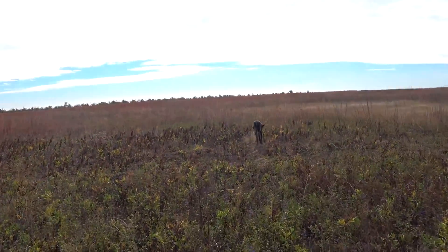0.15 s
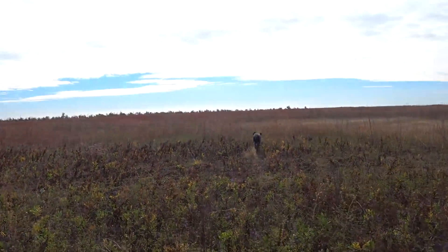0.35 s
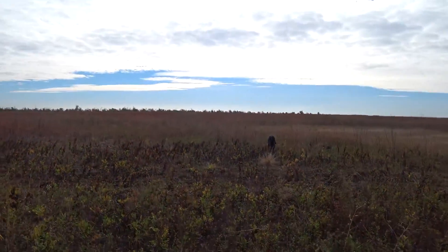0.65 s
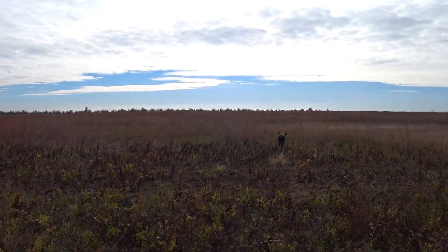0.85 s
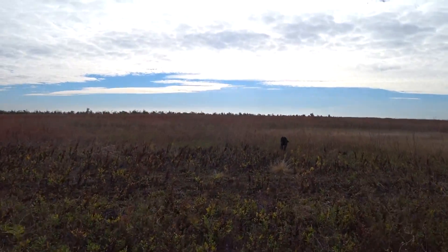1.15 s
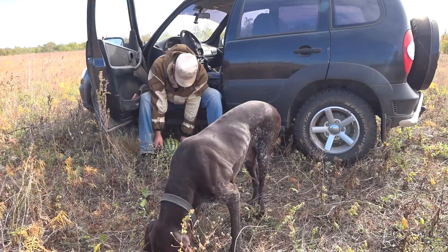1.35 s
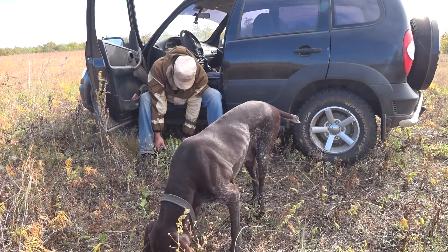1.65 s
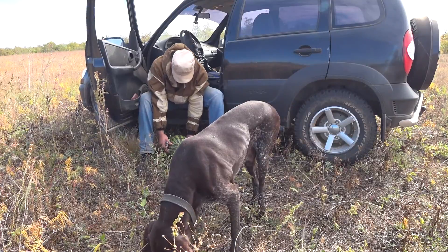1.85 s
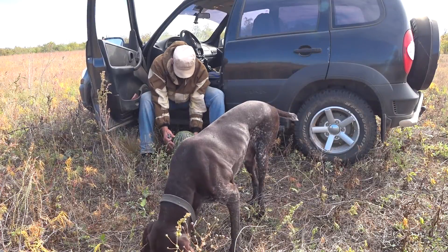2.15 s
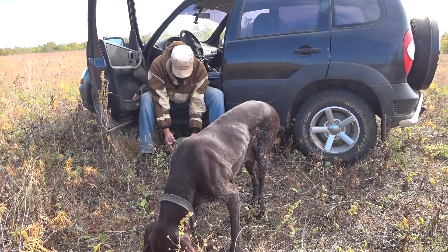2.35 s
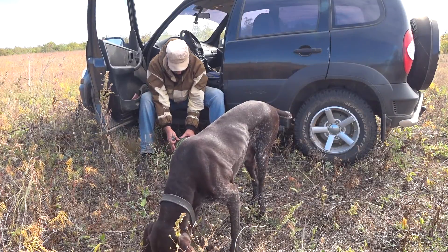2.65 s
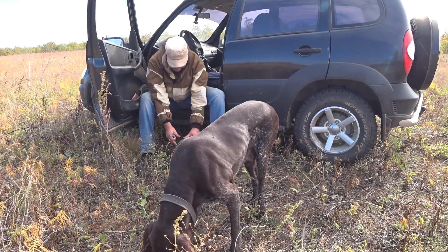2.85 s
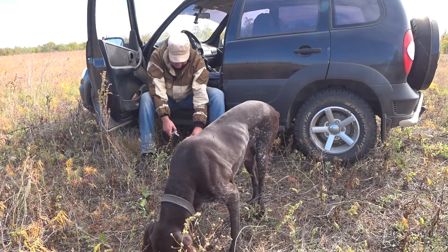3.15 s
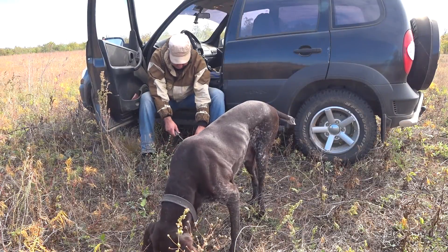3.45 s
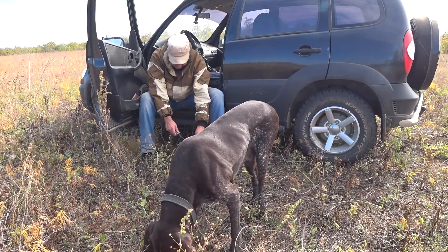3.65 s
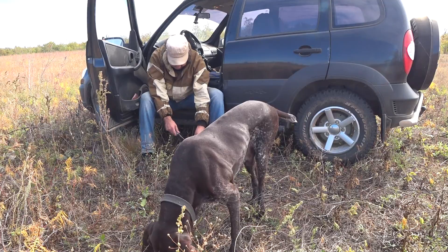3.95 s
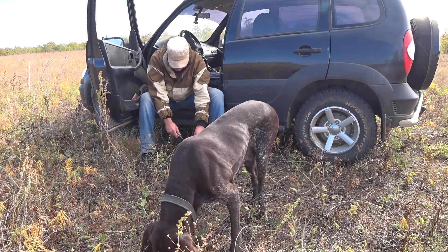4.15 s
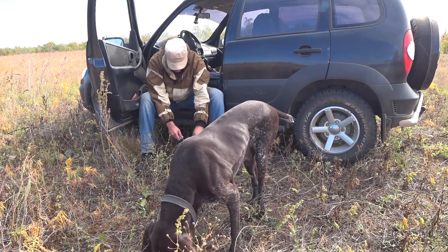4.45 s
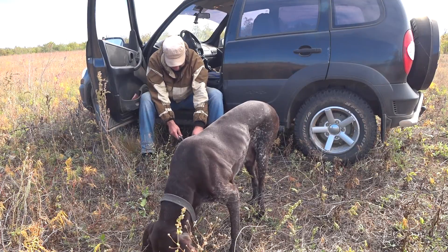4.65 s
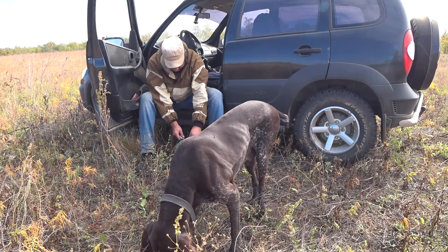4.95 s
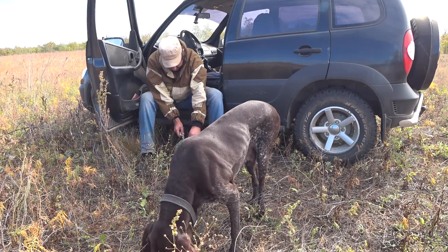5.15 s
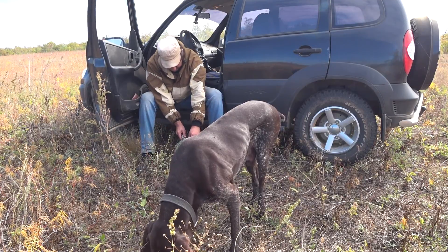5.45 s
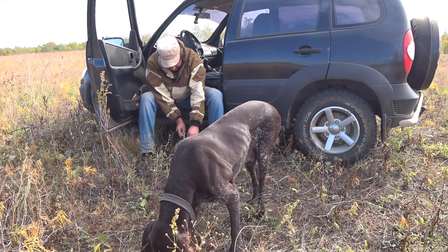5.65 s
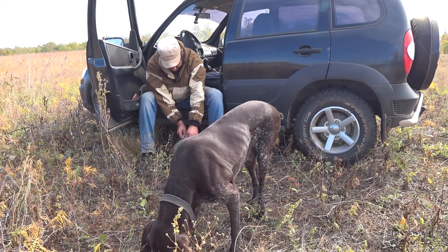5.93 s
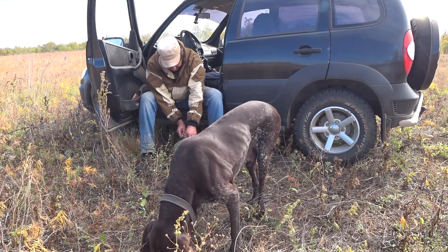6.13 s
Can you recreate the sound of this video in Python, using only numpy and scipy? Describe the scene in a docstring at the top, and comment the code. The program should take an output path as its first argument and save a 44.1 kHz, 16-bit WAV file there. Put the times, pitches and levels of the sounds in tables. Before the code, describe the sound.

Dry grass swishes and stalks snap around walking legs, then abruptly a dog close by laps wet food with quick, regular smacks and crackles.

```python
"""An open field: dry grass swishes and snaps around someone's legs; then, close by, a dog gulps wet food.
Mouth: about three times a second lips slap, the tongue pops free and saliva crackles, as decaying tones
and shaped clicks; these also excite the faintly ringing modes of the bowl.
Straw and grass are random impulses with a spectrum and an envelope; snaps are short resonant noise bursts.
During the meal a light wind flutters on the microphone; filtered noise forms the wind and the air."""
import sys
import numpy as np
from scipy import signal
from scipy.fft import rfft, irfft
from scipy.io import wavfile

SR = 44100
rng = np.random.default_rng(int(sys.argv[2]) if len(sys.argv) > 2 else 0)


def dump_mix(stems):
    """Bounce the given channels to the path in sys.argv[1] as a 16-bit WAV at rate SR."""
    frames = np.atleast_2d(stems).T  # one column per channel
    limited = np.clip(frames, -1, 1)  # hard clip at full scale
    pcm = np.round(limited * 32767).astype(np.int16)
    wavfile.write(sys.argv[1], SR, pcm)


N = 277475
TIME, FREQ = np.arange(N) / SR, np.fft.rfftfreq(N, 1 / SR)  # s, Hz
FIELD_END_S = 1.213  # the scene changes from the field to the dog's meal
EDGE_HZ = 16100

# Source levels below hold before propagation; the mouth is also high-passed.
# licks, timed at the smack: [t/s, pop level/dB, cavity f/Hz, ring/s, second pop level/dB, suck level/dB,
# spray level/dB (raised 7 dB in use), lip slap level/dB, drag lead/s, squish level/dB, rustle level/dB]
LICK_EVENTS = [(1.3276, -12.5, 1166, 0.00093, -21.5, -46, -38, -31, 0.03, -44.5, -50),
               (1.6269, -14.5, 1140, .001, -19, -45, -34.5, -32, 0.035, -44.5, -45.5),
               (1.9313, -18, 1157, 0.00096, -28, -49, -40.5, -33, 0.042, -46, -51.5),
               (2.328, -20, 1373, 0.0017, -42, -56, -48.5, -32, 0.041, -43.5, -42),
               (2.6225, -20.5, 1292, 0.0023, -22.5, -49, -40.5, -36.5, .05, -44, -48.5),
               (2.9366, -15.5, 1170, 0.00093, -29, -50, -46.5, -37.5, 0.039, -44, -50),
               (3.3254, -20.5, 1137, .0008, -31, -39.5, -40, -35.5, 0.033, -46.5, -51.5),
               (3.6228, -15, 1220, 0.00085, -22.5, -58, -36.5, -31.5, 0.038, -46, -48.5),
               (3.925, -8.5, 1300, 0.0006, -30, -45, -39, -32, 0.039, -44, -51),
               (4.3047, -17.5, 1363, 0.00062, -38, -41, -35.5, -29, 0.038, -39, -44),
               (4.6031, -14.5, 1247, .0007, -37, -43, -37.5, -36, 0.035, -43.5, -47.5),
               (4.908, -21, 1178, 0.00063, -20.5, -41, -42, -35, 0.043, -40.5, -47),
               (5.2998, -17, 1465, 0.0011, -42, -55, -33.5, -37, 0.057, -42.5, -50.5),
               (5.591, -13.5, 1177, 0.00086, -33, -47, -36.5, -34, 0.036, -46, -47.5),
               (5.8973, -9.5, 1218, 0.00091, -20.5, -61, -39, -34, 0.055, -40, -44.5),
               (6.2892, -12.5, 1210, 0.0006, -24, -43, -44, -31, 0.039, -41.5, -49)]
# modes of the lips flapping shut: [f/Hz, level/dB relative to the slap, ring/s]
LIP_MODES = [(460, -1, 0.00079), (947, 4, 0.00095)]
# the loudest saliva bubbles and crunches: [t/s, peak level/dB, f/Hz, ring/s]
LOUD_BUBBLES = [(1.4027, -26, 3020, 0.00035), (1.6298, -16.5, 2740, 0.00055),
                (1.6399, -14.5, 1850, 0.00042), (1.984, -31, 2960, 0.00062), (2.2353, -31, 4140, 0.0011),
                (2.2704, -28, 2620, 0.00074), (2.3213, -17.5, 1120, 0.00039), (2.3338, -18, 2550, 0.00045),
                (2.3906, -25, 2820, 0.00034), (2.8494, -31.5, 2910, 0.0017), (2.8755, -26.5, 660, 0.00094),
                (2.8868, -31.5, 3990, 0.0013), (3.119, -37.5, 2260, 0.0028), (3.4005, -30, 1520, .0013),
                (3.414, -18.5, 1670, 0.00053), (3.718, -30.5, 1910, 0.00076), (3.735, -35, 2200, 0.00088),
                (3.801, -32.5, 1530, .001), (3.837, -31, 2720, 0.00049), (4.0633, -17, 2570, 0.0002),
                (4.2054, -32.5, 3800, .0014), (4.3188, -14, 2520, 0.00054), (4.52, -30, 3450, 0.0007),
                (4.556, -31, 2710, .0006), (4.713, -34, 3130, 0.00078), (4.7866, -22, 3180, 0.00013),
                (5.0386, -20.5, 4500, 0.00017), (5.0486, -24.5, 1630, 0.00075), (5.2092, -25, 3410, 0.0013),
                (5.24, -14, 3280, 0.00034), (5.2944, -18, 1340, 0.00055), (5.303, -14.5, 2730, .00055),
                (5.5055, -32.5, 2490, .0016), (5.5403, -18.5, 3100, 0.00034), (5.7043, -34.5, 2040, .0012),
                (5.7673, -31, 1630, .00078), (6.0385, -33, 1480, 0.00052), (6.071, -34.5, 2360, 0.0017),
                (6.216, -25.5, 3980, 0.00083)]
# the loudest cracks of food and straw: [t/s, level/dB (lowered 2 dB in use), centre f/Hz]
CRACK_EVENTS = [(1.4552, -31.5, 7000), (1.5695, -32, 11100), (1.8271, -37.5, 10000), (1.8776, -29.5, 4470),
                (2.0641, -32, 5900), (2.2663, -36, 6800), (2.5039, -32.5, 10500), (2.767, -36.5, 11000),
                (2.96, -37, 7000), (3.2772, -34.5, 5700), (3.383, -31.5, 7060), (3.4063, -30.5, 12100),
                (3.5667, -28.5, 5230), (3.8169, -36, 8400), (3.8705, -33.5, 9800), (4.151, -37, 6170),
                (4.263, -41, 10000), (4.4296, -40.5, 12400), (4.5453, -18, 4600), (4.6522, -33.5, 12800),
                (4.7458, -39, 11600), (5.1056, -38, 10100), (5.2386, -28, 4600), (5.4303, -30, 11800),
                (5.5375, -30, 4140), (5.7318, -38.5, 11500), (6.2433, -29, 9700)]
# the muzzle nudges or grazes the bowl: [t/s, level/dB, extra level/dB of the long mode]
BOWL_KNOCKS = [(1.216, -48, -9), (1.707, -59.5, 20), (1.804, -48, 0), (2.202, -51, -7), (2.872, -52, 3),
               (3.293, -41.5, 3), (4.188, -44, -8), (4.66, -56, 6), (5.42, -52.5, 11), (6.17, -38.5, -3)]
# modes of the bowl: [f/Hz, level/dB, t60/s]
BOWL_MODES = [(635, 2.5, 0.15), (900, -1.5, 0.065), (1140, -8, 0.25), (1690, 8.5, 0.026), (2380, -6, 0.084)]
# the loudest stalks that snap in the field: [t/s, level/dB (lowered 2.5 dB in use), centre f/Hz]
STALK_SNAPS = [(0.3903, -25, 6400), (0.4171, -15, 6200), (0.4415, -20, 6850), (0.4734, -22, 4800),
               (0.4928, -22, 5000), (0.5246, -20, 4800), (0.5427, -25, 8200), (0.559, -25, 6800),
               (0.5945, -28.5, 6200), (0.6342, -24, 6100), (0.6649, -25.5, 2700), (0.7103, -23, 6050),
               (0.7613, -24, 5740), (0.7854, -14, 5750), (0.8142, -30, 6100), (0.8847, -25, 4630),
               (0.9372, -24, 7900), (1.0217, -27, 5100), (1.0766, -27.5, 7200), (1.1074, -24, 7150),
               (1.1412, -26, 6400), (1.1485, -26, 11200)]
# legs through the grass, two strides: [t/s, level/dB (lowered 4 dB for the brushing)]
LEG_SWISH = [(0, -38.5), (.035, -35), (.088, -48), (.16, -36.5), (.225, -23), (.25, -18), (.275, -20.5),
             (.34, -17), (.385, -21), (.407, -17), (.445, -33), (.49, -30.5), (.615, -42.5), (.65, -40),
             (.72, -32.5), (.81, -40), (.91, -31.5), (.977, -21.5), (1.04, -34), (1.209, -41.5)]
# a foot comes down on stalks: [t/s, level/dB, hold/s]
FOOTSTEPS = [(0.32, -28, 0.03), (0.848, -25, 0.045)]
# wind on the microphone: [t/s, level/dB (raised 2 dB in use)]
WIND_GUSTS = [(1.215, -91), (1.53, -58), (1.7, -65), (1.92, -64), (1.98, -48), (2.18, -54.5), (2.31, -44),
              (2.5, -77), (2.79, -63), (2.84, -49.5), (2.99, -53), (3.08, -57), (3.27, -48.5),
              (3.35, -37.5), (3.6, -51.5), (3.69, -44.5), (3.82, -50.5), (4.06, -41.5), (4.36, -52),
              (4.55, -50), (4.78, -44.5), (5.06, -42), (5.15, -35.5), (5.38, -55), (5.6, -38),
              (5.75, -64.5), (5.83, -48.5), (6.16, -63.5), (6.284, -35.5)]

# filter for froth and grit in the wet food and spray: [f/Hz, gain/dB]
SALIVA_FILTER = [(300, 17), (800, 0), (1400, 2), (2000, -1.5), (3000, 2.5), (4500, -1), (6500, -2),
                 (8500, -14), (16000, -22)]
SPRAY_FILTER = [(800, -12), (1800, 3), (2800, 5.5), (4200, 4.5), (6000, 1.5), (8000, -8.5), (12000, -21),
                (16000, -30)]
# relative spectra of straw, grass blades, crushed stalks and low bending stems: [f/Hz, level/dB per Hz]
STRAW_SPECTRUM = [(2000, -22), (5000, 1), (7000, -1.5), (10000, 3), (13000, 0.5), (16000, -6)]
GRASS_SPECTRUM = [(60, -68), (130, -65), (250, -37), (450, -24), (1050, -15.5), (1900, -14), (3200, -5.5),
                  (4500, -3), (6300, 0), (8000, -5.5), (10300, -5.5), (12000, -12.5), (15000, -4),
                  (16500, -34)]
STALK_SPECTRUM = [(300, -23.5), (900, -1), (2000, -5), (3200, 1.5), (6000, 6), (8000, -5), (16000, -36)]
SCUFF_SPECTRUM = [(60, -52), (200, -16), (450, -2.5), (1000, 0.5), (1800, -1.5), (3500, -3.5), (8000, -24)]
# relative spectra of wind turbulence, the breeze's rumble beside the car, and air: [f/Hz, level/dB per Hz]
WIND_SPECTRUM = [(20, -38), (60, -15.5), (120, -2), (220, 1.5), (400, -1), (600, -7.5), (1000, -20.5),
                 (2000, -38), (6000, -53)]
RUMBLE_SPECTRUM = [(20, -27), (50, -7), (110, -3), (200, -7), (400, -56), (2000, -52)]
AIR_SPECTRUM = [(20, -41), (100, -13), (200, -13), (420, -9.5), (940, -1.5), (1460, 0.5), (1960, -4),
                (4500, -13), (7300, -12.5), (11000, -16.5), (15000, -22), (16500, -20)]

# phase by which the left microphone port leads, for wind and for direct sound: [f/Hz, phase/rad]
WIND_LEAD = [(30, -2), (80, 1.4), (160, 1.46), (300, 2), (700, 2.5)]
DIRECT_LEAD = [(100, 0.45), (2500, 0), (5000, 0.15), (8500, 0.46), (12000, 0), (16000, 0)]
# direct sound, left port minus right: [f/Hz, level/dB]
DIRECT_BALANCE = [(100, 0), (2500, -0.2), (5000, 1), (8500, 2.5), (12000, 3.5), (16000, -1)]
# near blades, side signal against middle: [f/Hz, level/dB]
BLADE_SIDE = [(100, -30), (700, -3), (1300, -18), (2500, -74), (4500, -25), (8500, -12), (12000, -5),
              (16000, -47)]

# the course of every lick: leads before and lags after its smack
TOUCH_LEAD_S, SLAP_LEAD_S, SECOND_POP_S, SPRAY_LAG_S = 0.1233, 0.037, 0.0085, 0.01
SECOND_POP_RATIO = 1.229  # the cavity has shrunk by then
# (rise dB/s, fall dB/s): the tongue lands, drags through food, the mouth settles
TOUCH_SLOPES, DRAG_SLOPES, SETTLE_SLOPES = (1300, 180), (185, 207), (600, 380)
# (rise dB/s, fall dB/s): the muzzle stirs the straw, which then springs back
RUSTLE_SLOPES, SPRING_SLOPES = (116, 340), (1500, 300)
# wet noise as the tongue lands, as the mouth settles, and between licks
TOUCH_DB, SETTLE_DB, WET_FLOOR_DB = -49.5, -43, -57.5
# straw springing back, and between licks, before a 0.5 dB cut
SPRING_DB, RUSTLE_FLOOR_DB = -50.5, -64
# small bubbles at random in the wake of each smack: median level and pitch, with normal spreads
BUBBLE_DB, BUBBLE_SPREAD_DB, BUBBLE_HZ, BUBBLE_OCTAVES, BUBBLE_RING_S = -40.5, 4, 2380, 0.61, 0.00049
CLUSTER_LAG_S, CLUSTER_JITTER_S, CLUSTER_WIDTH_S = 0.09, 0.024, 0.018
TICK_DB, TICK_HZ = -45, 10100  # faint ticks at random times
LONG_MODE_S = 0.2  # a bowl mode with a longer t60 sings when grazed
# (rise dB/s, fall dB/s) of a step; flattened stalks creak on, at a level relative to the step
STEP_SLOPES, CREAK_DB, CREAK_SLOPES = (3800, 660), -18, (1200, 62)


def smacks():
    """Cavity resonance: lips slap, the tongue pops twice, air sucks through a narrowing gap, saliva sprays."""
    out, spray_gain = np.zeros(N), np.zeros(N)
    t = np.arange(1800) / SR
    for s, pop_db, hz, ring, second_db, suck_db, spray_db, slap_db, *_ in LICK_EVENTS:
        for lip_hz, lip_db, lip_ring in LIP_MODES:
            add(out, s - SLAP_LEAD_S, gain_of(slap_db + lip_db) * pop(lip_hz, lip_ring))
        add(out, s, gain_of(pop_db) * pop(hz, ring, glide=0.0019))
        add(out, s, gain_of(pop_db - 22) * pop(hz * 2.2, ring * 1.5))  # second cavity mode
        add(out, s + SECOND_POP_S, gain_of(second_db) * pop(hz * SECOND_POP_RATIO, ring))

        # suction: narrow-band noise carried on a rising cavity tone
        noise = rng.standard_normal((len(t), 2)) @ [1, 1j]
        flutter = signal.lfilter([1], [1, -np.exp(-np.pi * 260 / SR)], noise)
        rising = np.exp(2j * np.pi * hz * (t + 6 * t ** 2))
        envelope = np.exp(-((t - 0.0095) / 0.0058) ** 2)
        add(out, s, gain_of(suck_db) * evened((flutter * rising).real * envelope))
        add(spray_gain, s, gain_of(spray_db + 7) * np.exp(-abs(t - SPRAY_LAG_S) / 0.0073))
    spray = froth(SPRAY_FILTER, per_s=1500, spread_db=3.0, cycles=2.1, hiss=0.25)
    return out + spray_gain * spray


def chewing():
    """Power addition of wet bubble noise as the tongue lands, drags through food and settles."""
    power = gain_of(WET_FLOOR_DB) ** 2
    for s, *_, lead, squish_db, _ in LICK_EVENTS:
        touch = swell(s - TOUCH_LEAD_S, TOUCH_DB, TOUCH_SLOPES)
        drag = swell(s - lead, squish_db, DRAG_SLOPES)
        settle = swell(s + SPRAY_LAG_S, SETTLE_DB, SETTLE_SLOPES)
        power = power + touch ** 2 + drag ** 2 + settle ** 2
    clumps = gain_of(2.8 * slow_chance(130))
    foam = froth(SALIVA_FILTER, per_s=900, spread_db=3.2, cycles=2.1, hiss=0.1)
    grit = coloured(crackle(260, 3), SPRAY_FILTER)
    return np.sqrt(power) * (clumps * foam + grit / 2) * (TIME > FIELD_END_S)


def bubbles(count=4):
    """Bubble resonance: loud single saliva bursts, and a cluster of small ones after every smack."""
    out = np.zeros(N)
    for s, db, hz, ring in LOUD_BUBBLES:
        add(out, s, gain_of(db) * pop(hz, ring, glide=0.0043))
    for s, *_ in LICK_EVENTS:
        centre = s + CLUSTER_LAG_S + CLUSTER_JITTER_S * rng.standard_normal()
        for late, loud, high in rng.standard_normal((count, 3)):
            bubble = pop(BUBBLE_HZ * 2 ** (BUBBLE_OCTAVES * high), BUBBLE_RING_S)
            gain = gain_of(BUBBLE_DB + BUBBLE_SPREAD_DB * loud)
            add(out, centre + CLUSTER_WIDTH_S * late, gain * bubble)
    return out


def bowl(mouth):
    """Modal resonance: the bowl rings when nudged, and faintly in response to the mouth."""
    t, out = np.arange(SR // 2) / SR, np.zeros(N)
    for hz, db, t60 in BOWL_MODES:
        mode = gain_of(db - 60 * t / t60) * np.sin(2 * np.pi * hz * t)
        out += gain_of(-60.5) * signal.oaconvolve(mouth, mode)[:N]
        for s, knock_db, sing_db in BOWL_KNOCKS:
            add(out, s, gain_of(knock_db + sing_db * (t60 > LONG_MODE_S)) * mode)
    return out


def straw(count=6):
    """Impulsive friction: dry stems crackle with each push of the muzzle; crisp bits crack and tick."""
    power = gain_of(RUSTLE_FLOOR_DB) ** 2
    for s, *_, lead, _, rustle_db in LICK_EVENTS:
        push = swell(s - lead, rustle_db, RUSTLE_SLOPES)
        spring_back = swell(s + SPRAY_LAG_S, SPRING_DB, SPRING_SLOPES)
        power = power + push ** 2 + spring_back ** 2
    stems = gain_of(2.5 * slow_chance(110)) * coloured(crackle(550, 4.4), STRAW_SPECTRUM)
    rustle = gain_of(-0.5) * np.sqrt(power) * stems * (TIME > FIELD_END_S)
    ticks = [(s, TICK_DB, TICK_HZ) for s in rng.uniform(FIELD_END_S, N / SR, count)]
    cracks = gain_of(-2.0) * snaps(CRACK_EVENTS, decay=0.0012, width=0.25, splinter=0.16)
    return rustle + cracks + snaps(ticks, decay=0.0012, width=0.25, splinter=0.16)


def grass():
    """Friction and fracture: blades brush past in clumps, brighter when stronger; stalks are crushed and snap."""
    in_field = TIME < FIELD_END_S
    swish = level(LEG_SWISH)
    brushing = swish * gain_of(-4 + 1.85 * slow_chance(100)) * in_field
    middle, side = (coloured(crackle(7000, 3.1), GRASS_SPECTRUM) for _ in range(2))
    side = irfft(rfft(side) * gain_of(read(BLADE_SIDE)), N)
    scuff_gain = gain_of(-29.5) * swish ** 0.45  # grows more slowly than the hiss
    scuff = scuff_gain * coloured(crackle(1500, 5.5), SCUFF_SPECTRUM)

    weight = 0
    for s, db, hold in FOOTSTEPS:
        press = swell(s, db, STEP_SLOPES, hold)
        creak = swell(s, db + CREAK_DB, CREAK_SLOPES, hold)
        weight = weight + np.maximum(press, creak)
    crush = weight * coloured(crackle(6000, 2.5), STALK_SPECTRUM)
    breaks = gain_of(-2.5) * snaps(STALK_SNAPS, decay=0.00093, width=0.39, splinter=0.067)
    near = brushing * middle + (scuff + crush) * in_field + breaks
    return outdoors(near, scatter_db=-12.0, t60=0.01) + np.outer([1, -1], brushing * side)


def wind():
    """Turbulent pressure: lumpy gusts reach the two ports out of phase, over a rumble common to both."""
    eddies = rfft(coloured(rng.standard_normal(N), WIND_SPECTRUM))
    ports = irfft(eddies * np.exp(0.5j * np.outer([1, -1], read(WIND_LEAD))), N)
    own = np.array([coloured(rng.standard_normal(N), WIND_SPECTRUM) for _ in range(2)])
    lumps = gain_of(3.2 * slow_chance(35) + 2)
    rumble = gain_of(-66.5) * coloured(rng.standard_normal(N), RUMBLE_SPECTRUM)
    return (lumps * level(WIND_GUSTS) * (ports + 0.32 * own) + rumble) * (TIME > FIELD_END_S)


def air():
    """Diffuse noise: the faint, slightly stirring hiss of the field, largely independent at the two ports."""
    common, left, right = (coloured(rng.standard_normal(N), AIR_SPECTRUM) for _ in range(3))
    stir = gain_of(-65 + 3.7 * slow_chance(38))
    return stir * (common + 3.45 * np.array([left, right]))


def outdoors(x, scatter_db, t60):
    """Propagation and scattering: direct sound just left of centre; ground, stems and car scatter it briefly."""
    balance = gain_of(np.outer([0.5, -0.5], read(DIRECT_BALANCE)))
    lead = np.exp(0.5j * np.outer([1, -1], read(DIRECT_LEAD)))
    direct = irfft(rfft(x) * balance * lead, N)
    t = np.arange(SR // 4) / SR
    decay = np.exp(-np.log(1000) * t / t60) * (t > 0.002)
    taps = rng.standard_normal((3, len(t))) * decay
    tail = taps[0] + 0.21 * taps[1:]  # mostly shared, partly each port's own
    scattered = signal.oaconvolve(x[None], tail / np.linalg.norm(tail[0]), axes=1)[:, :N]
    return direct + gain_of(scatter_db) * scattered


def pop(hz, ring, glide=0):
    """Damped resonance of an air pocket: a tone swells and dies; a positive glide raises its pitch."""
    t = np.arange(900) / SR
    u = t / ring
    pitch = hz * (1 + glide * (u - 1) / (u + 1))
    return u * np.exp(1 - u) * np.sin(2 * np.pi * np.cumsum(pitch) / SR)


def froth(spectrum, per_s, spread_db, cycles, hiss):
    """Superposed bubble resonances: many tiny bubbles of many sizes burst over a little hiss."""
    pitches = np.geomspace(700, 12000, 30)
    bursts = np.zeros(N)
    for hz in pitches:
        ring = evened(pop(hz, cycles / hz, glide=1 / 20)) * np.sqrt(hz)
        bursts += signal.oaconvolve(crackle(per_s / len(pitches), spread_db), ring)[:N]
    return coloured(evened(bursts) + hiss * rng.standard_normal(N), spectrum)


def snaps(rows, decay, width, splinter):
    """Brittle fracture: a sharp noise burst around its own pitch, with a slower tail of splinters."""
    out, t = np.zeros(N), np.arange(1024) / SR
    hz = np.fft.rfftfreq(len(t), 1 / SR) + 1
    for s, db, centre in rows:
        envelope = np.exp(-t / decay) + splinter * np.exp(-t / 0.004)
        burst = rng.standard_normal(len(t)) * envelope
        resonance = 1 / (1 + 1j * (hz / centre - centre / hz) / width)
        snap = irfft(rfft(burst) * resonance)
        add(out, s, gain_of(db) * snap / np.std(snap[:128]))
    return out


def crackle(per_s, spread_db):
    """Random impulse process: clicks at chance moments, most small and a few large, at rms 1."""
    size = gain_of(spread_db * np.minimum(rng.exponential(1, N), 4))
    return evened(size * rng.choice([-1, 1], N) * (rng.random(N) < per_s / SR))


def swell(s, db, slopes, hold=0):
    """Exponential growth and decay: a gain reaches db at time s, holds, and falls; slopes in dB/s."""
    rise, fall = slopes
    drop = np.maximum(rise * (s - TIME), fall * (TIME - s - hold))
    return gain_of(db - np.clip(drop, 0, 120))


def slow_chance(rate_hz):
    """Low-passed noise: a smooth random curve of rms 1."""
    return evened(irfft(rfft(rng.standard_normal(N)) * np.exp(-(FREQ / rate_hz) ** 2), N))


def coloured(x, spectrum):
    """Linear filtering: shapes x by a spectrum table, at rms 1."""
    return evened(irfft(rfft(x) * gain_of(read(spectrum)), N))


def read(points):
    """Logarithmic frequency interpolation: a table read at every frequency."""
    hz, value = np.transpose(points)
    return np.interp(np.log(FREQ + 1), np.log(hz + 1), value)


def level(curve):
    """Level interpolation: a dB curve as an amplitude gain on every sample."""
    return gain_of(np.interp(TIME, *np.transpose(curve)))


def gain_of(db):
    """Decibel law: level to amplitude."""
    return 10 ** (np.asarray(db) / 20)


def evened(x):
    """Power normalisation: scales to rms 1."""
    return x / np.sqrt(np.mean(x ** 2) + 1e-20)


def add(mix, s, sound):
    """Superposition: adds a sound into the mix at time s."""
    part = mix[max(round(s * SR), 0):][:len(sound)]
    part += sound[:len(part)]


def scene():
    """Superposition of feeding dog, grass, wind and air; a small mouth radiates little bass."""
    bass_cut = signal.butter(2, 260, "high", fs=SR, output="sos")
    mouth = signal.sosfilt(bass_cut, smacks() + chewing() + bubbles())
    dog = outdoors(mouth + bowl(mouth) + straw(), scatter_db=-7.0, t60=0.026)
    return dog + grass() + wind() + air()


def record(dry):
    """Band limitation: the recorder's low-pass filter."""
    low_pass = signal.firwin(511, EDGE_HZ, window=("kaiser", 9), fs=SR)
    return signal.oaconvolve(dry, low_pass[None], "same")


dry = scene()
out = record(dry)
dump_mix(out)
```